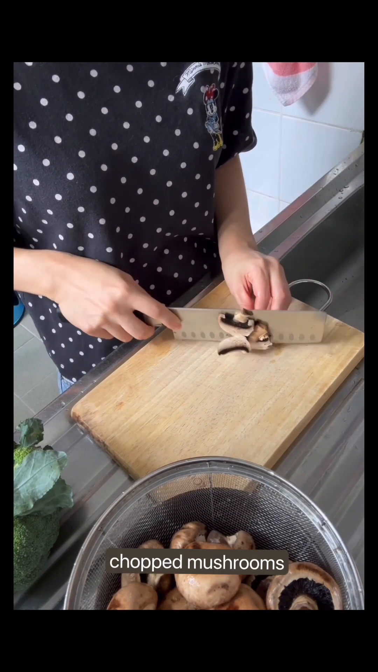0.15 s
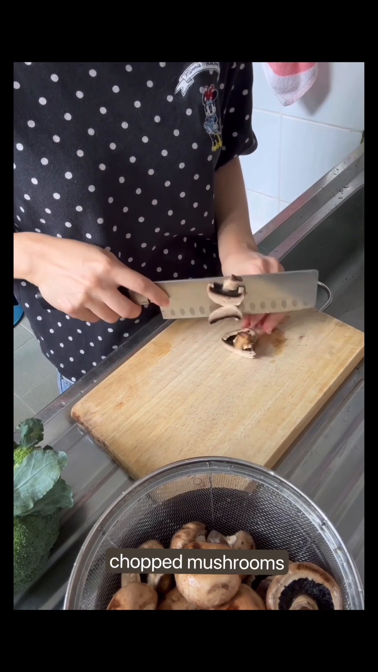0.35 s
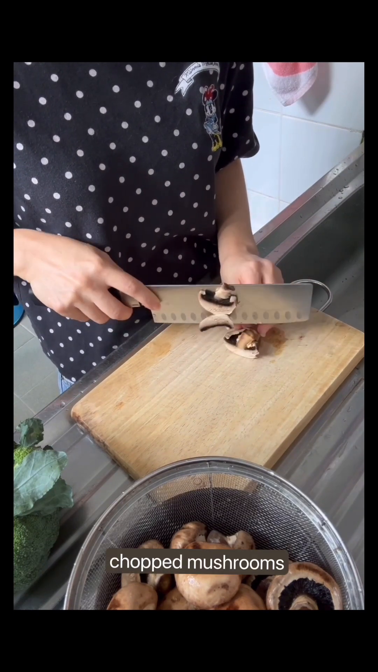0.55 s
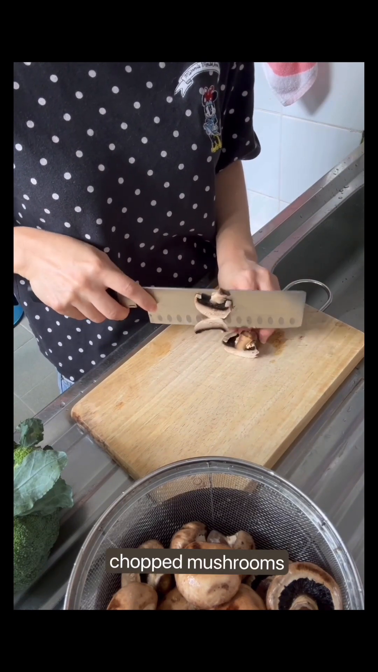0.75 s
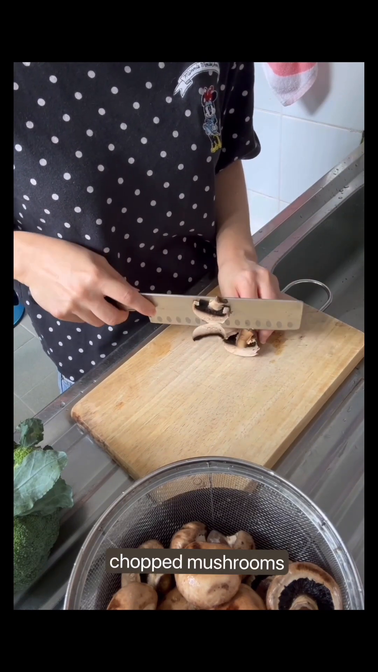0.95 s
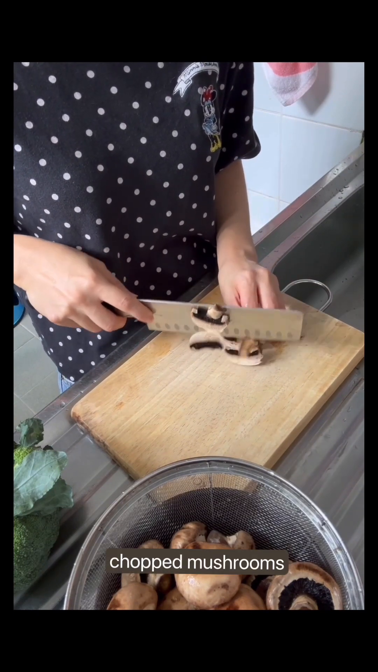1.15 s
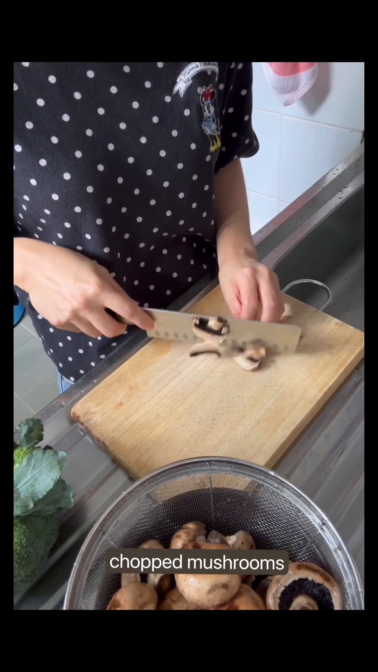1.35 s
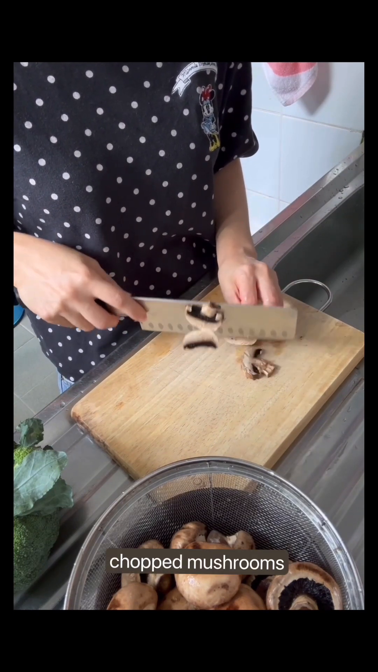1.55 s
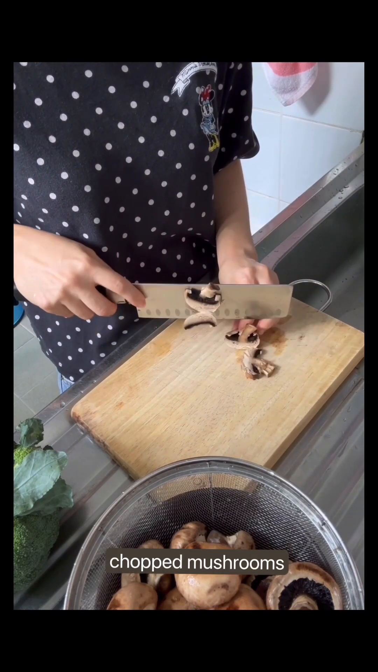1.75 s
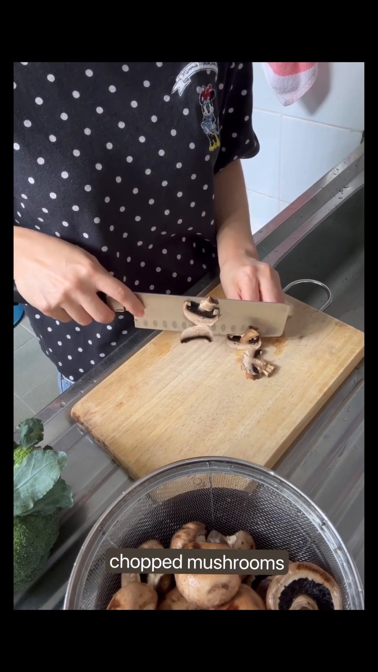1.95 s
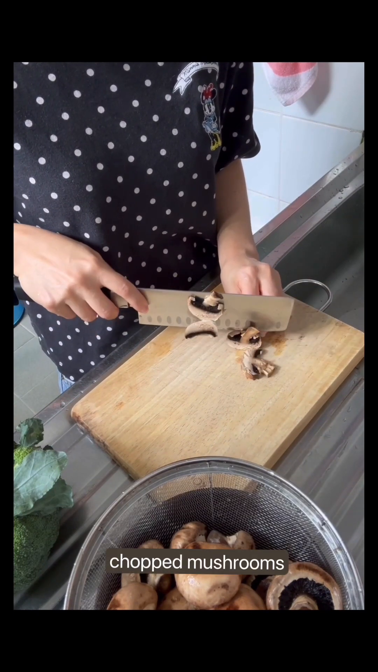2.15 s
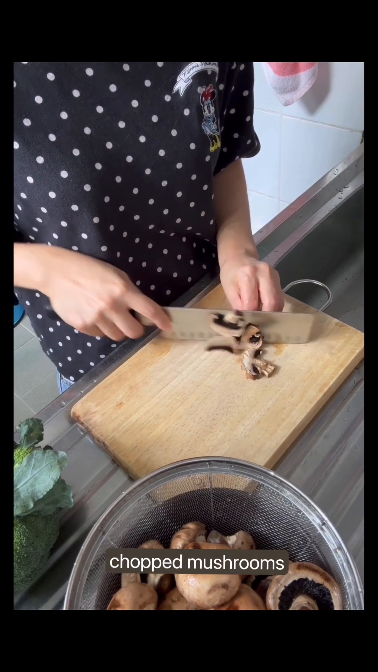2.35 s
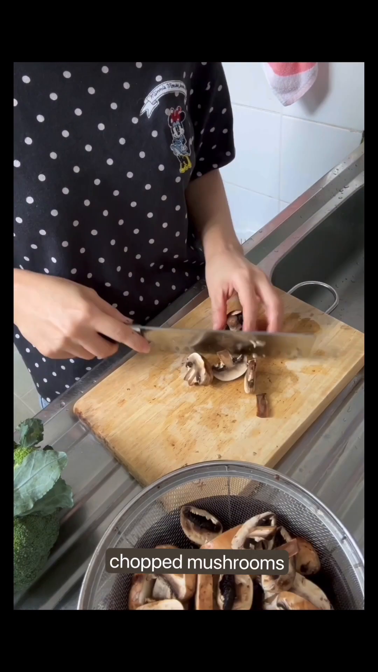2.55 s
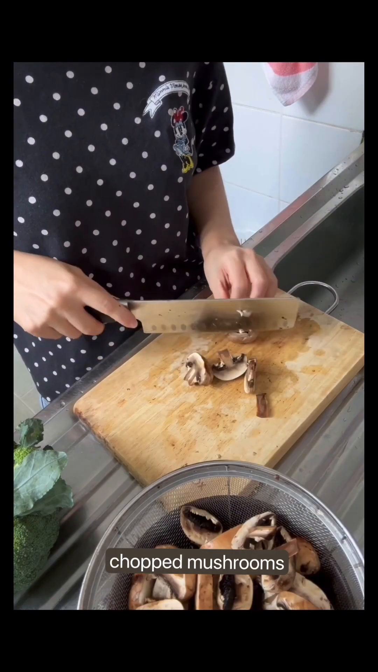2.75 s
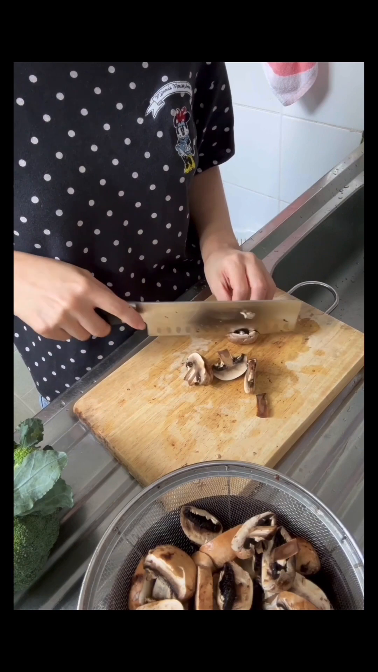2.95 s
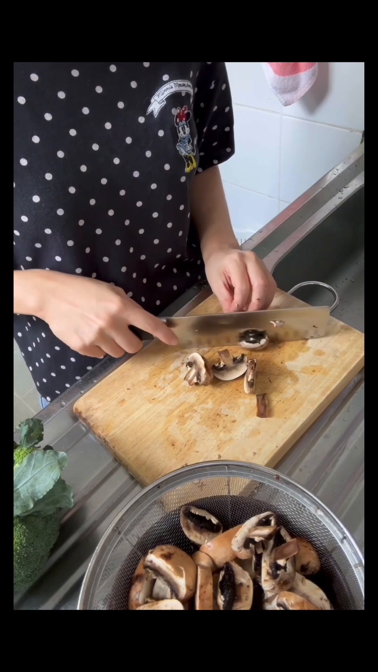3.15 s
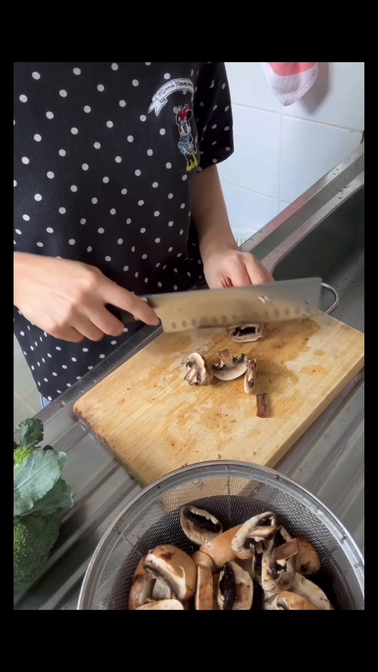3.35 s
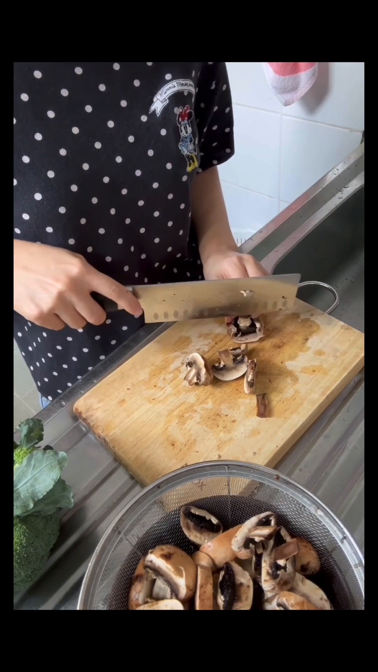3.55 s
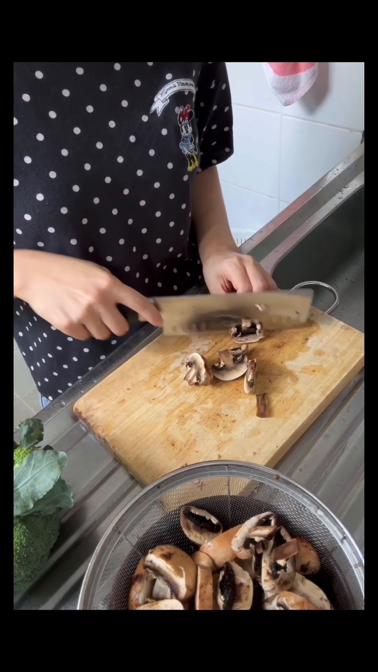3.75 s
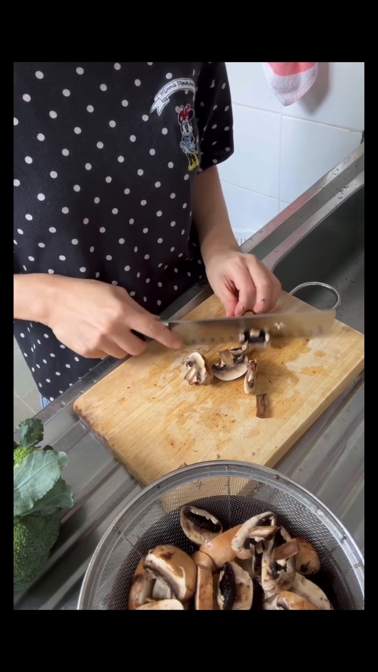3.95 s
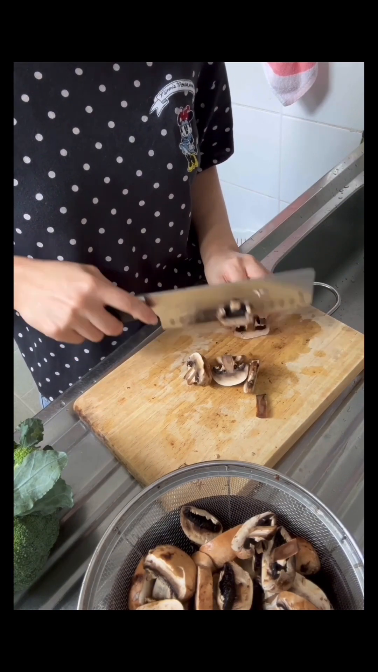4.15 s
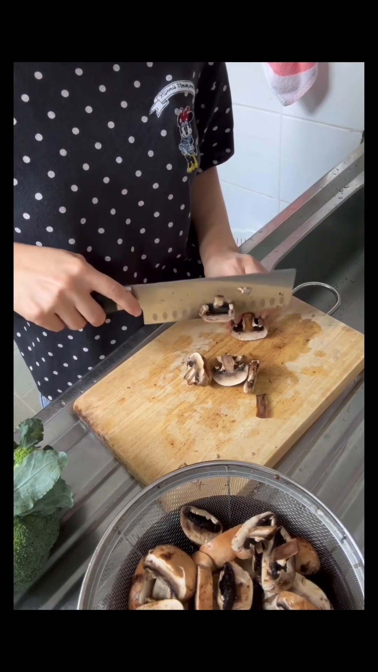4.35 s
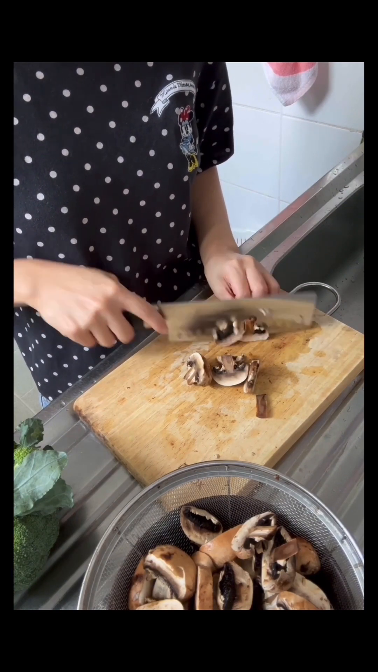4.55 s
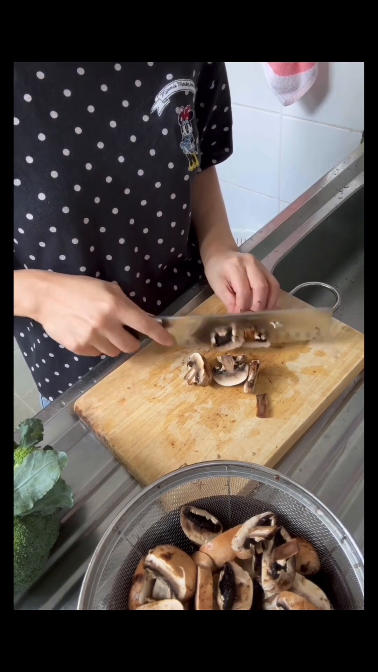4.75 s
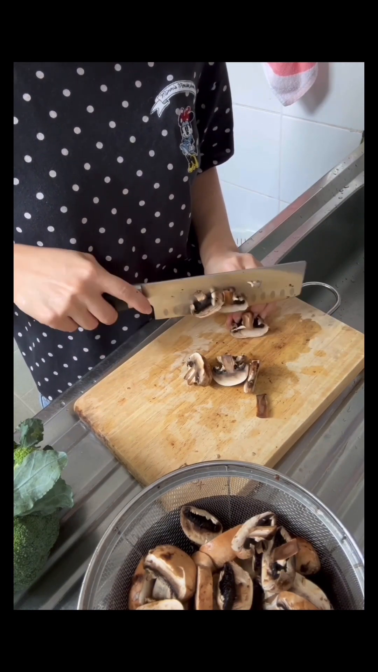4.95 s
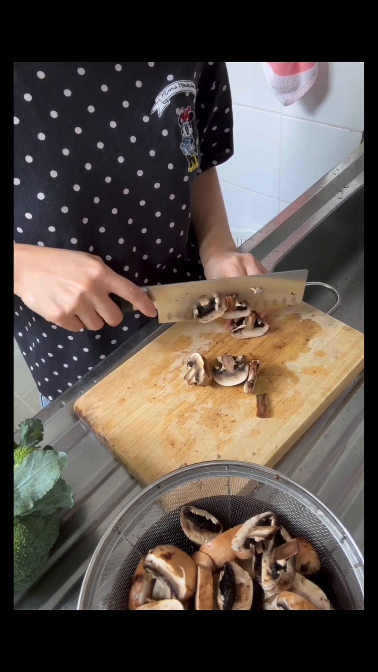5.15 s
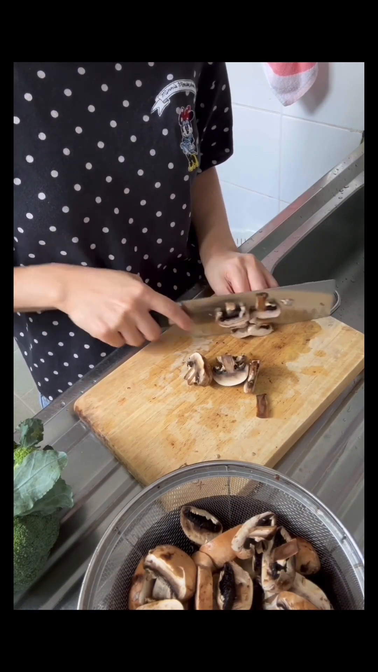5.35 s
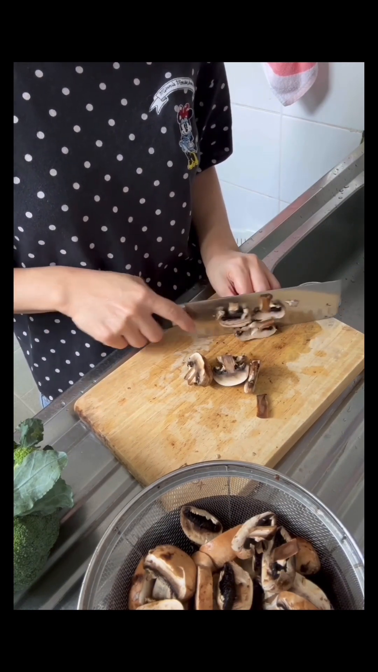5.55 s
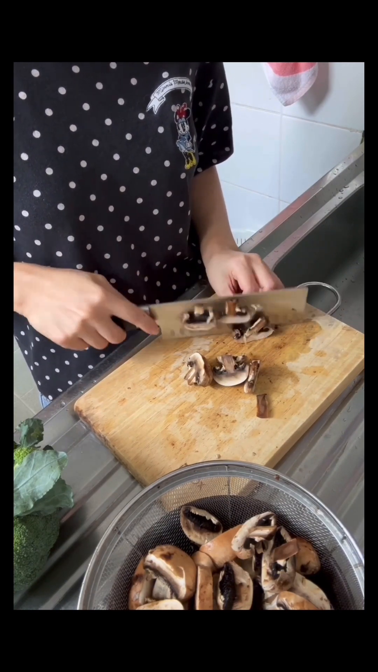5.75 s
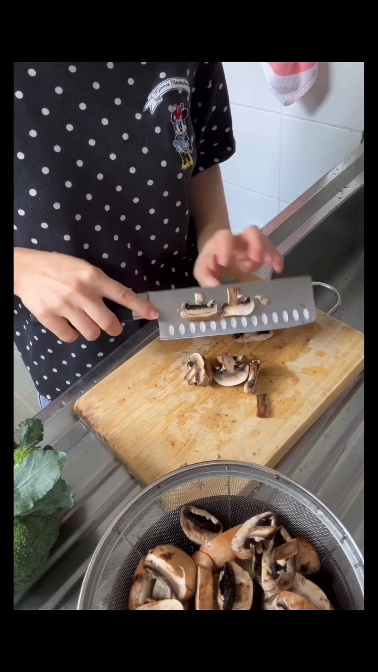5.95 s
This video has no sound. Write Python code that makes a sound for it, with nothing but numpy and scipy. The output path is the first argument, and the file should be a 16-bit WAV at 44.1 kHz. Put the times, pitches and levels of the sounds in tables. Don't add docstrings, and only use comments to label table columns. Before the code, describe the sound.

A heavy blade slices mushrooms, each cut a loud woody knock with a brief steel ring, above quiet extractor hum and soft rustling slides.

```python
import sys
import numpy as np
from scipy import signal
from scipy.fft import rfft, irfft, next_fast_len
from scipy.io import wavfile

SR = 44100
rng = np.random.default_rng(int(sys.argv[2]) if len(sys.argv) > 2 else 0)


def wav_out(sig):
    wavfile.write(sys.argv[1], SR, np.round(np.clip(np.atleast_2d(sig).T, -1, 1) * 32767).astype(np.int16))


def gain_from_db(level_db):
    decades = np.asarray(level_db, float) / 20
    return 10 ** decades


N = 264159


def rms_one(x):
    return x / np.sqrt(np.mean(x ** 2) + 1e-20)


def in_time(rows):
    s, *columns = np.transpose(rows)
    return [np.interp(np.arange(N) / SR, s, c) for c in columns]


def at_hz(points, hz):
    table_hz, level_db = np.transpose(points)
    return np.interp(np.log(hz), np.log(table_hz), level_db)


def drift(rate):
    r = np.exp(-80 * np.pi * rate / SR)
    noise = rng.standard_normal(N // 40 + 2002)
    slow = rms_one(signal.lfilter([1], [1, -2 * r, r * r], noise)[2000:])
    return np.interp(np.arange(N) / 40, np.arange(len(slow)), slow)


def pair(mid, side):
    return np.array([mid + side, mid - side])


def add(out, s, sound):
    i = round(s * SR)
    out[:, i:i + sound.shape[-1]] += sound[..., :N - i]


def resonator(noise, hz, width_hz):
    r = np.exp(-np.pi * width_hz / SR)
    return signal.lfilter([1, 0, -1], [1, -2 * r * np.cos(2 * np.pi * hz / SR), r * r], noise)


def resonant(noise, table):
    out = 0
    for k, (hz, width_hz, level_db) in enumerate(table):
        out = out + (-1) ** k * gain_from_db(level_db) * rms_one(resonator(noise, hz, width_hz))
    return rms_one(out)


def grit(count, length, shared):
    noise = rng.standard_normal((count, 3, length))
    return noise[:, :2] + shared * noise[:, 2:]


# f/Hz, level/dB
WIDTH = [(60, -50), (110, -58.5), (200, -60.5), (380, -14.5), (700, -15), (1290, -1.5), (1900, -5.5),
         (2300, -7.5), (2700, 1.5), (4400, -8), (6500, 2.5), (9000, -3.5), (15000, -2.5)]


def coloured(spectrum, wider_db):
    hz = np.arange(1, N // 2 + 2) * SR / N
    shape = gain_from_db(at_hz(spectrum, hz)) * (hz > spectrum[0][0]) * (hz < spectrum[-1][0])
    mid, side = rfft(rng.standard_normal((2, N))) * shape
    mid = irfft(mid, N)
    side = irfft(side * gain_from_db(at_hz(WIDTH, hz) + wider_db), N)
    lean = 0.082
    return pair(mid, side - lean * rms_one(mid) * side.std()) / mid.std()


# f/Hz, level/dB (per Hz)
AIR = [(150, -37), (175, -6.5), (205, -1), (300, -3.5), (425, -10.5), (740, -9.5), (950, -17),
       (1300, -22.5), (1800, -18), (2300, -18.5), (3000, -27), (4500, -31.5), (6900, -45), (8000, -58)]
# multiple of shaft rate, level/dB, side rel mid/dB
FAN = [(1.03, -45, -34.5), (4.94, -46, -54), (25.1, -64, -19.5), (29.96, -57, -4.5), (50.36, -55, -3),
       (51.5, -65.5, -0.5)]
# f/Hz, width/Hz, level/dB, side rel mid/dB
DUCT = [(208, 18.5, -46, -46), (388.8, 6.5, -50.5, -26), (465.3, 12.3, -50, -21), (1109, 3.8, -56.5, -4),
        (1266, 10, -63, -3), (1978, 65, -50, -24), (2856, 20, -62.5, -0.5), (3090, 46, -71, 1.5),
        (4070, 67, -71, -17.5)]


def fan(air_db):
    below_db, shaft_hz = 8.0, 28.65
    out = gain_from_db(air_db + below_db) * coloured(AIR, wider_db=1.5) * gain_from_db(0.93 * drift(7.8))
    turning = 2 * np.pi * np.cumsum(shaft_hz * (1 + 0.000704 * drift(1.33))) / SR
    for multiple, level_db, side_db in FAN:
        phase = multiple * turning + rng.uniform(0, 2 * np.pi)
        wobble = gain_from_db(level_db + 3.5 + 1.33 * drift(14))
        out += wobble * pair(np.sin(phase), gain_from_db(side_db) * np.cos(phase))
    for hz, width_hz, level_db, side_db in DUCT:
        mid, side = resonator(rng.standard_normal((2, N)), hz, width_hz)
        out += gain_from_db(level_db + 1.6 * drift(6.3)) * pair(rms_one(mid), gain_from_db(side_db) * rms_one(side))
    return out


# f/Hz, level/dB (per Hz)
RUMBLE = [(12, -39.5), (20, -2), (32, -20), (49, -0.5), (94, 2), (108, -1), (123, -10.5), (135, -16.5),
          (151, -10), (158, -18), (170, -36.5), (220, -51), (370, -120)]
# t/s, level/dB
TRAFFIC = [
    (0.0, -36),
    (0.67, -37.5),
    (1.65, -34),
    (2.25, -35.5),
    (3.82, -33.5),
    (4.42, -34),
    (4.77, -34.5),
    (5.99, -35.5),
]


def street():
    level_db = in_time(TRAFFIC)[0] + 2.4 + 1.5 * drift(2.1)
    return gain_from_db(level_db + 1.5) * coloured(RUMBLE, wider_db=-18.0)


# f/Hz, level/dB (per Hz)
HISS = [(5500, -23), (7000, 6), (8500, 9), (10300, -2.5), (13000, -20), (16000, -18)]


def port_hiss():
    return gain_from_db(-69.0) * coloured(HISS, wider_db=-46.5)[0] * [[1], [-1]]


# f/Hz, level/dB (per Hz)
RUSTLE = [(3000, -25.5), (6500, -1.5), (9000, -2), (10500, 1), (12000, -6), (14000, -4.5), (16000, -10.5)]
# t/s (loudest), level/dB, rise/s, fall/s
SLIDES = [(.45, -68, 0.035, .04), (.91, -73, 0.043, .03), (1.15, -67.5, .05, 0.085), (1.32, -66, .04, .03),
          (2.15, -66, .03, .03), (2.38, -61, 0.046, .04), (2.68, -70.5, .1, .05), (3.46, -66, .06, .06),
          (3.975, -62.5, 0.016, .02), (4.28, -72, .06, .1), (4.72, -68, .03, .04), (5.25, -60, .02, .015),
          (5.6, -60, .09, 0.059), (5.67, -57, 0.04, 0.037)]


def swish(later):
    floor_db, later_db, flutter_db = -75, 4, 3
    stroke_db, stroke_rise_s, stroke_fall_s = -57.5, 0.045, 0.065
    roundness = 1.4
    t, noise = np.arange(N) / SR, coloured(RUSTLE, wider_db=3.5)
    power = gain_from_db(floor_db + later_db * later + flutter_db * drift(9)) ** 2
    strokes = [(s, stroke_db + peak_db, stroke_rise_s, stroke_fall_s) for s, peak_db, *_ in CHOPS]
    for s, level_db, rise, fall in strokes + SLIDES:
        distance = np.abs(t - s) / np.where(t < s, rise, fall)
        power += gain_from_db(level_db) ** 2 * np.exp(-2 * distance ** roundness)
    return np.sqrt(power) * noise


def modes(t, table, luck, spread_db, turn):
    hz, level_db, t60 = np.transpose(table)[:, :, None]
    luck = luck[:, :len(table), None]
    ears = []
    for e in (0, 1):
        level = gain_from_db(level_db + spread_db * luck[e] - 60 * t / t60)
        ears.append(level * np.sin(2 * np.pi * hz * t + turn * luck[2 + e] * hz / 1000))
    return np.sum(ears, axis=1)


# t/s, peak level/dB, thud f/Hz, drumming length/s, edge crack rel level/dB
CHOPS = [
    (2.3156, -3, 746, 0.0068, -15.5),
    (3.0362, -3, 733, 0.0061, -25),
    (3.7750, -3, 746, 0.0052, -26),
    (4.5555, -1.5, 760, 0.0058, -19),
    (5.346, -0.5, 746, 0.0055, -27.5),
]
# f/Hz, level/dB, t60/s
BOARD = [(452, -26, 0.19), (639, -19, 0.1), (687, -27.5, 0.18), (800, -19, 0.16), (856, -15, 0.027),
         (944, -12.5, 0.045), (1031, -11.5, 0.061)]
EDGE = [(1610, 450, -4.5), (2170, 85, -4.5), (2450, 300, -2.5), (2630, 410, -3.5), (3000, 250, -9)]
SNAP = [(1300, 630, 3), (2600, 1860, 3.5), (4400, 1500, -6)]
CLATTER = [(460, 150, 0.5), (700, 130, 0.5), (822, 113, 1), (993, 180, 3.5), (1400, 370, -7.5)]
BLADE = [(3800, 710, -15.5), (4700, 870, 1), (5530, 340, -4.5), (10000, 3000, -8), (13500, 3000, -8.5)]


def chops():
    snap_db, snap_s = 7.0, 0.00066
    tick_db, tick_follows_edge = -26, 0.43
    lead_s, thud_lag_s = 0.0012, 0.0006
    out, t = np.zeros((2, N)), np.arange(SR // 4) / SR
    luck = rng.standard_normal((len(CHOPS), 4, 8))
    noise = grit(len(CHOPS), len(t), shared=1.14)
    crack, blade = resonant(noise, EDGE), resonant(noise, BLADE)
    clatter = resonant(noise[:, :1] * 7.1 + noise, CLATTER)
    snap = resonant(noise, SNAP) * (1 - np.exp(-t / 0.00025)) * np.exp(-t / snap_s)
    swell = 1 - np.exp(-(t / 0.0011) ** 2)
    press = np.exp(-t[SR // 50::-1] / 0.012)
    for k, (s, peak_db, thud_hz, hold, crack_db) in enumerate(CHOPS):
        touch, peak = s - lead_s, gain_from_db(peak_db)
        add(out, touch - 1 / 50, gain_from_db(peak_db - 32.5) * press * clatter[k - 1, :, :len(press)])
        edge = gain_from_db(crack_db - 5.0) * crack[k] * (np.exp(-t / 0.0022) + 0.49 * np.exp(-t / 0.033))
        tick = blade[k] * (np.exp(-t / 0.0026) + 0.23 * np.exp(-t / 0.031))
        tick *= gain_from_db(tick_db + tick_follows_edge * crack_db)
        add(out, touch, peak * (edge + tick + gain_from_db(crack_db + snap_db) * snap[k]))
        settle = np.exp(-(np.maximum(t - hold, 0) / 0.0016) ** 0.54)
        cycles = thud_hz * (t + 0.00034 * (1 - np.exp(-t / 0.00099)))
        drum = np.sin(2 * np.pi * cycles - np.array([[.25], [0]])) * gain_from_db([[-1.2], [1.2]])
        thud = swell * settle * drum
        body = (1 - np.exp(-t / 0.0046)) * modes(t, BOARD, luck[k], spread_db=5.7, turn=0.7)
        wood = gain_from_db(-18.5) * clatter[k] * (1 - np.exp(-(t / 0.0056) ** 2)) * np.exp(-t / 0.02)
        add(out, touch + thud_lag_s, peak * (thud + body + wood))
    return out


# t/s, level/dB, f/Hz, t60/s
THUMPS = [(2.314, -10, 220, 0.035), (2.329, -22.5, 115, 0.2), (2.387, -26, 443, .08),
          (3.037, -23.5, 380, 0.048), (3.776, -10.5, 370, 0.033), (3.79, -22, 130, 0.12),
          (4.557, -17.5, 280, 0.06), (4.574, -14, 208, 0.14), (4.58, -17, 117, 0.2),
          (4.612, -22.5, 312, 0.057), (5.346, -12.5, 365, 0.035), (5.349, -26, 281, 0.11)]


def thumps():
    out, t = np.zeros((2, N)), np.arange(SR // 4) / SR
    for s, level_db, hz, t60 in THUMPS:
        onset = 1 - np.exp(-t * hz / 0.73)
        add(out, s, gain_from_db(level_db - 60 * t / t60) * onset * np.sin(2 * np.pi * hz * t))
    return out


# t/s, level/dB, f/Hz, t60/s, left minus right level/dB
RINGS = [(2.315, -20.5, 2710, 0.02, 17.5), (2.315, -27, 4700, 0.02, 7), (2.316, -30.5, 1610, 0.16, 8),
         (2.316, -31, 2230, .07, -3), (3.036, -32.5, 2300, 0.092, 1), (3.038, -35, 2450, 0.11, 2),
         (3.775, -22, 2088, 0.054, 0.5), (3.776, -41, 2580, 0.08, 1), (4.555, -18, 1890, 0.026, 9),
         (4.557, -17.5, 1465, 0.045, -8), (5.345, -19.5, 2055, 0.045, -4), (5.345, -21, 1460, 0.072, -8.5)]


def rings():
    out, t = np.zeros((2, N)), np.arange(SR // 4) / SR
    for s, level_db, hz, t60, pan_db in RINGS:
        ears = gain_from_db([[pan_db / 2], [-pan_db / 2]]) * np.sin(2 * np.pi * hz * t + np.array([[0], [.8]]))
        add(out, s, gain_from_db(level_db - 60 * t / t60) * (1 - np.exp(-t / 0.00078)) * ears)
    return out


def singing():
    blade_hz, level, t60_s, damped_s = 1113, -19, 0.25, 0.047
    out, t = np.zeros((2, N)), np.arange(SR // 4) / SR
    ears = np.sin(2 * np.pi * blade_hz * t + np.array([[0], [.9]])) * gain_from_db([[-1.5], [1.5]])
    choke = np.exp(-np.maximum(t - damped_s, 0) / 0.01)
    for s, peak_db, *_ in CHOPS:
        add(out, s, gain_from_db(peak_db + level - 60 * t / t60_s) * (1 - np.exp(-t / 0.0039)) * choke * ears)
    return out


# t/s, clatter level/dB, length/s, drum f/Hz, drum level/dB
BOUNCES = [
    (2.3865, -21, 0.013, 767, -20.5),
    (4.564, -12.5, 0.0031, 900, -17),
    (4.613, -19, 0.011, 700, -26),
    (5.482, -29, 0.0072, 677, -25),
    (3.066, -40.5, .008, 890, -32),
    (3.83, -38.5, 0.0067, 800, -36),
]


def bounces():
    edge_db, cut_hz, skip = -24, 820, 999
    out, t = np.zeros((2, N)), np.arange(SR // 4) / SR
    noise = grit(len(BOUNCES), len(t), shared=1.14)
    clatter = resonant(noise[:, :1] * 7.1 + noise, CLATTER)
    rough = (clatter + gain_from_db(edge_db) * resonant(noise, EDGE))[..., skip:]
    rough = signal.sosfilt(signal.butter(2, cut_hz, fs=SR, output="sos"), rough)
    t = t[:rough.shape[-1]]
    for burst, (s, peak_db, length, drum_hz, drum_db) in zip(rough, BOUNCES):
        drum = gain_from_db(drum_db) * np.sin(2 * np.pi * drum_hz * t) * gain_from_db([[-1.2], [1.2]])
        envelope = (1 - np.exp(-8.0 * t / length)) * np.exp(-t / length)
        add(out, s, (gain_from_db(peak_db) * burst + drum) * envelope)
    return out


def droplet():
    out = np.zeros((2, N))
    add(out, 2.4812, gain_from_db(-44) * np.array([1, -1]))
    return out


# t/s, length/s, start f/Hz, end f/Hz, level/dB
BIRDS = [(2.61, .08, 5100, 4900, -68), (2.82, .12, 3850, 4000, -68), (3.11, .07, 4850, 4780, -65),
         (3.71, .08, 5100, 5200, -70), (3.80, .08, 3300, 3280, -61), (3.94, .08, 3950, 3950, -66),
         (4.17, .1, 4700, 4950, -66), (4.245, .08, 5000, 4880, -66), (4.22, .05, 3950, 3780, -68),
         (4.32, .07, 3020, 2930, -62), (5.755, .06, 5600, 4900, -66), (5.80, .05, 4850, 4700, -64)]


def birds():
    out = np.zeros((2, N))
    slow = signal.butter(2, 80, fs=SR, output="sos")
    for s, length, start_hz, end_hz, level_db in BIRDS:
        t = np.arange(round(length * SR)) / SR
        phase = 2 * np.pi * np.cumsum(start_hz + (end_hz - start_hz) * t / length) / SR
        blur = signal.sosfilt(slow, rng.standard_normal((2, 2, len(t) + 999)))[..., 999:]
        blur = rms_one(blur + blur[:, :1]) + .45
        note = blur[0] * np.sin(phase) + blur[1] * np.cos(phase)
        add(out, s, gain_from_db(level_db + 7) * np.sin(np.pi * t / length) ** .7 * note)
    return out


# t/s, peak level/dB, length/s
TICKS = [
    (3.9729, -39, 0.0047),
    (5.244, -50, 0.003),
]
# f/Hz, width/Hz, level/dB
SMACK = [(4500, 1500, 5), (7540, 3600, -2), (10600, 2500, -3.5), (14500, 3000, -3)]


def ticks():
    out, t = np.zeros((2, N)), np.arange(SR // 20) / SR
    smacks = resonant(grit(len(TICKS), len(t), shared=2.1), SMACK)
    for burst, (s, peak_db, length) in zip(smacks, TICKS):
        burst = burst / burst[:, :round(length * SR)].std()
        add(out, s, gain_from_db(peak_db - 2.0) * burst * (1 - np.exp(-t / 0.00056)) * np.exp(-t / length))
    return out


# t/s, f/Hz, level/dB
ENGINE = [
    (4.0, 93.3, -26),
    (4.062, 98, -16),
    (4.176, 88.4, -26),
    (4.524, 86.3, -25.5),
    (4.676, 85, -48),
    (4.7, 85.6, -29),
]


def engine():
    hz, level_db = in_time(ENGINE)
    t = np.arange(N) / SR
    near = np.clip((t - ENGINE[0][0]) / 0.42, 0, 1) * np.clip((ENGINE[-1][0] - t) / 0.12, 0, 1)
    return near * gain_from_db(level_db + 1.5) * np.sin(2 * np.pi * np.cumsum(hz) / SR)


def kitchen(x):
    t60_s, wall_cut_hz = 0.16, 10500
    size = next_fast_len(N + SR)
    w = 2 * np.pi * np.arange(size // 2 + 1) / size
    dull = 1 / (1 + 1j * w * SR / (2 * np.pi * wall_cut_hz))
    room = np.zeros((2, len(w)), complex)
    for k, lag in enumerate(rng.uniform(0.011, 0.038, 16) * SR):
        loop = gain_from_db(-60 * lag / SR / t60_s) * dull * np.exp(-1j * w * round(lag))
        room[k % 2] += (-1) ** (k // 2) * loop / (1 - loop)
    return irfft(rfft(x, size) * room, size)[:, :N]


# low f/Hz, high f/Hz, level/dB
SUM_GAPS = [(6840, 8330, -21), (8330, 8850, -12.5), (12500, 13700, -2.5), (13700, 14400, -6),
            (14400, 19000, -21)]
DIFFERENCE_GAPS = [(10350, 13500, -16)]


def thin_treble(x):
    edge = SR // 10
    size = next_fast_len(N + 2 * edge)
    ramp = np.minimum(np.arange(size), np.arange(size)[::-1])
    fade = np.minimum(ramp / (size - N) * 4, 1)
    x = np.pad(x, ((0, 0), (edge, size - N - edge)), "reflect") * fade
    hz = np.arange(size // 2 + 1) * SR / size
    mid, side = rfft((x[0] + x[1]) / 2), rfft((x[0] - x[1]) / 2)
    for part, gaps in ((mid, SUM_GAPS), (side, DIFFERENCE_GAPS)):
        for low_hz, high_hz, loss_db in gaps:
            part[(hz > low_hz) & (hz < high_hz)] *= gain_from_db(loss_db)
    return pair(irfft(mid, size), irfft(side, size))[:, edge:edge + N]


def scene():
    later = np.clip((np.arange(N) / SR - 2.47) / .05, 0, 1)
    steady = fan(-47.5 + 0.83 * later) + street() + port_hiss()
    rustle = swish(later)
    close = chops() + thumps() + rings() + singing() + bounces()
    far = birds()
    room = kitchen(gain_from_db(-26) * close.mean(0) + gain_from_db(-16) * far.mean(0))
    return thin_treble(steady + rustle + close + far + room + engine()) + droplet() + ticks()


def top_cut(x):
    return signal.sosfilt(signal.butter(12, 15640, fs=SR, output="sos"), x)


def record(dry):
    mix = 1.285 * np.tanh(dry / 1.386)
    return top_cut(mix)


dry = scene()
out = record(dry)
wav_out(out)
```